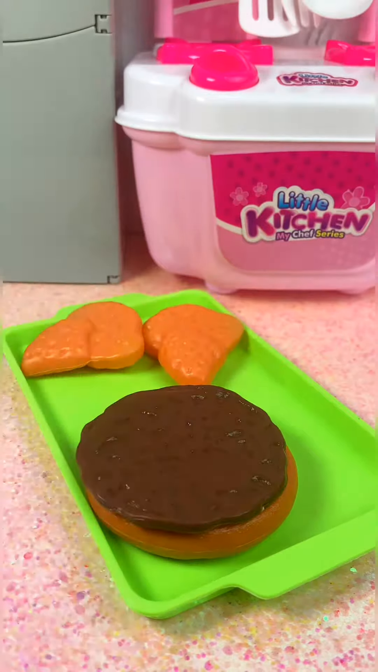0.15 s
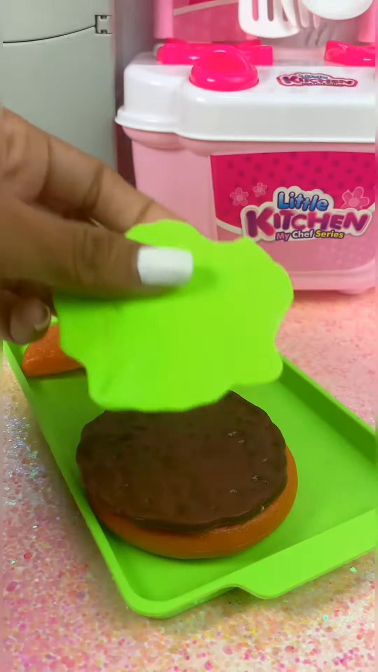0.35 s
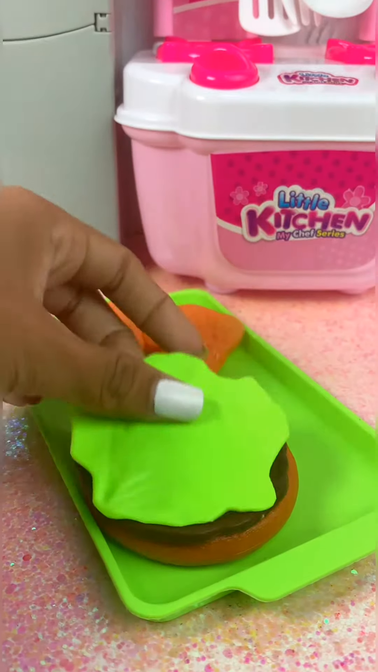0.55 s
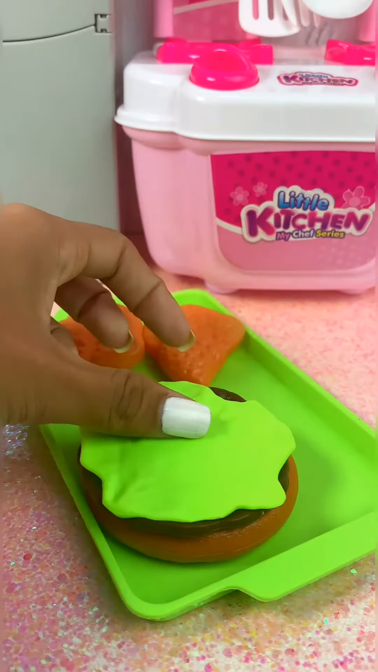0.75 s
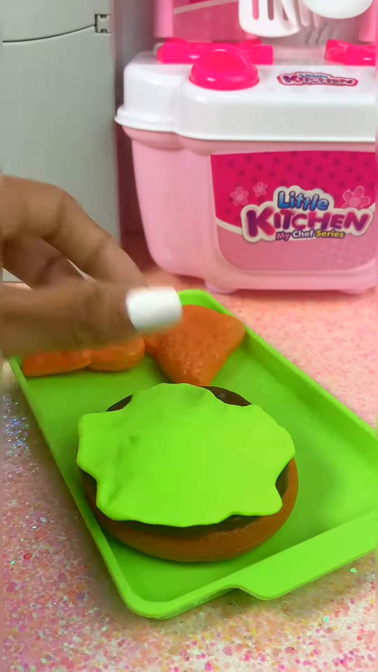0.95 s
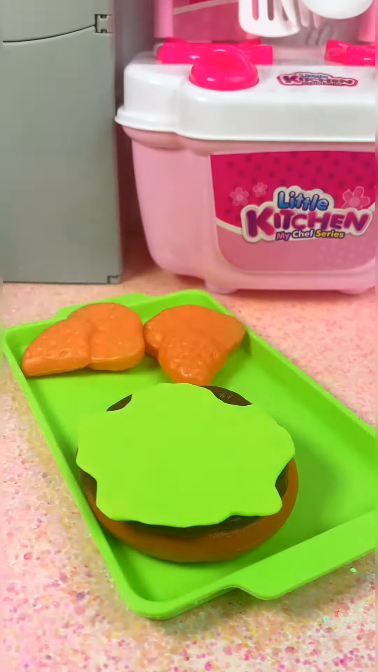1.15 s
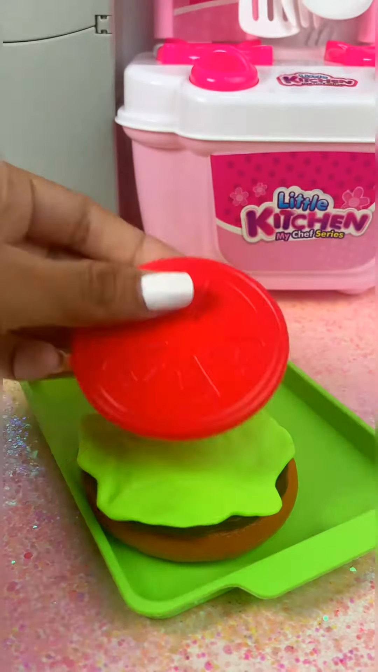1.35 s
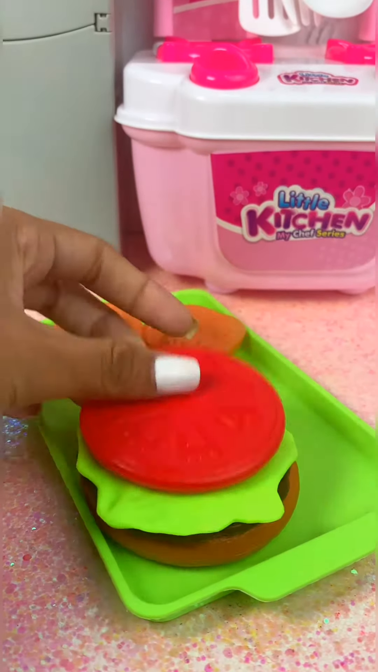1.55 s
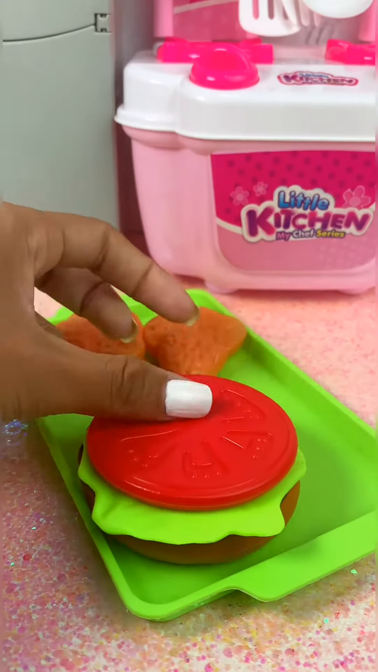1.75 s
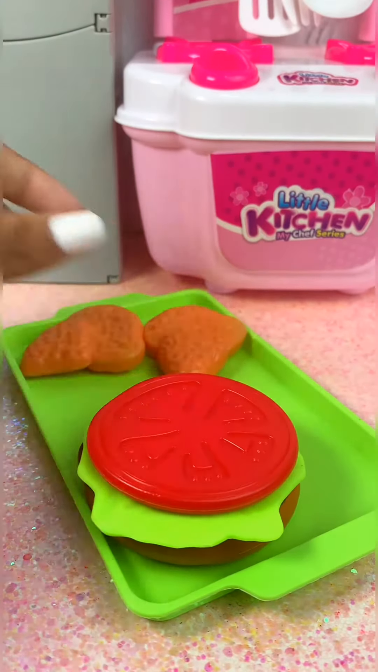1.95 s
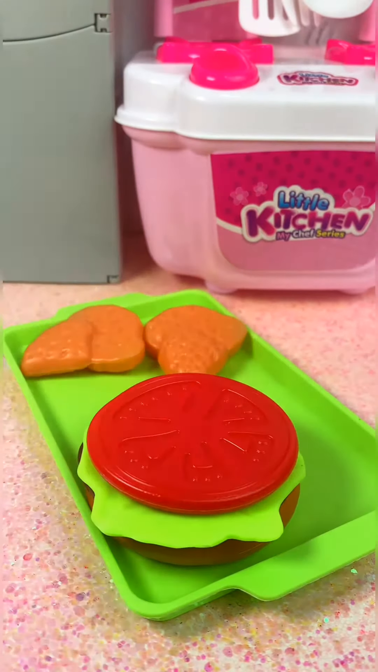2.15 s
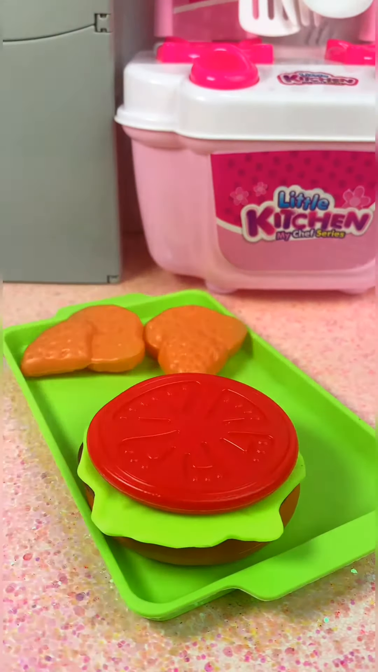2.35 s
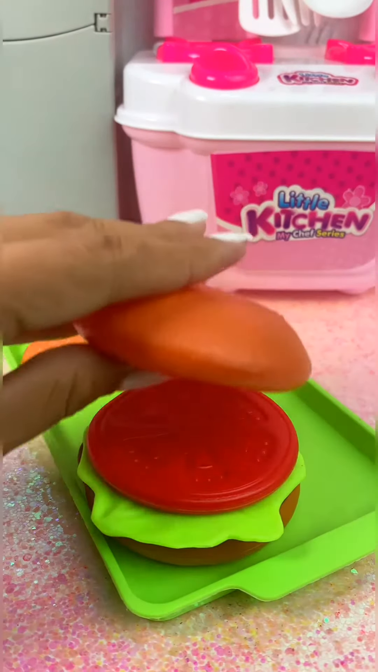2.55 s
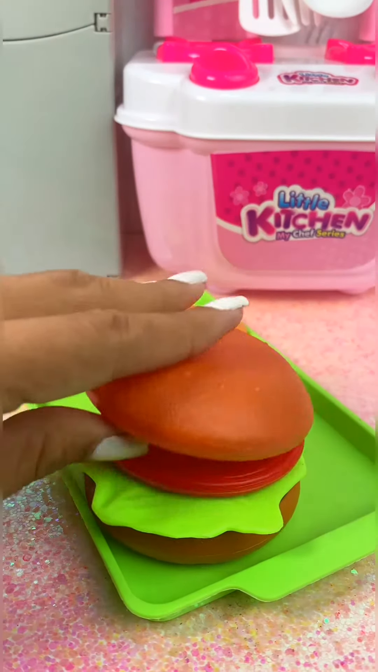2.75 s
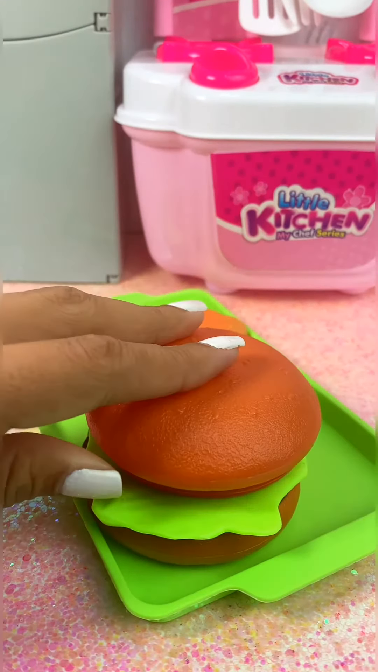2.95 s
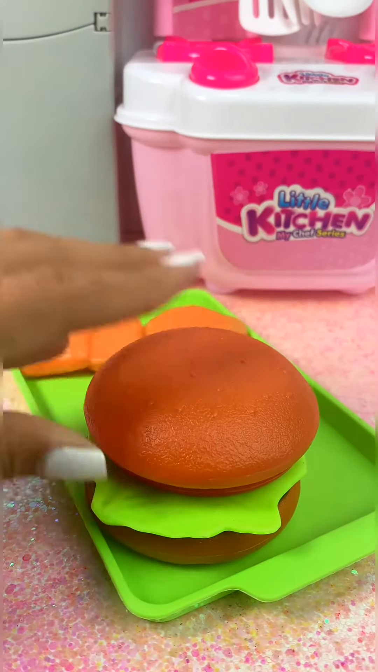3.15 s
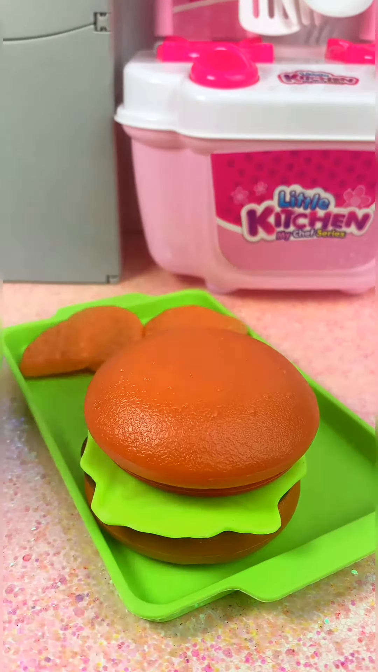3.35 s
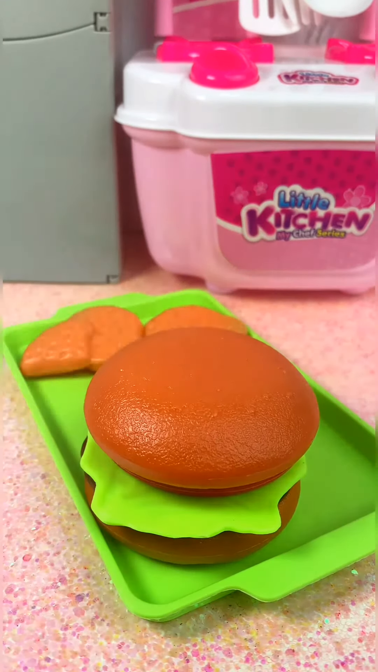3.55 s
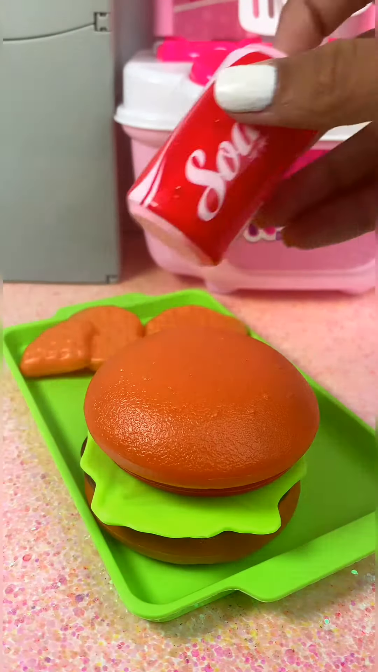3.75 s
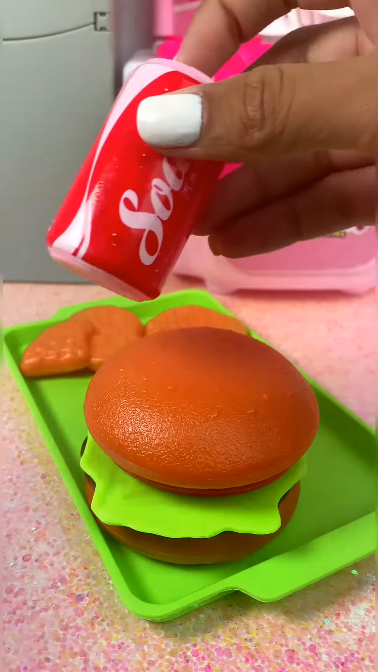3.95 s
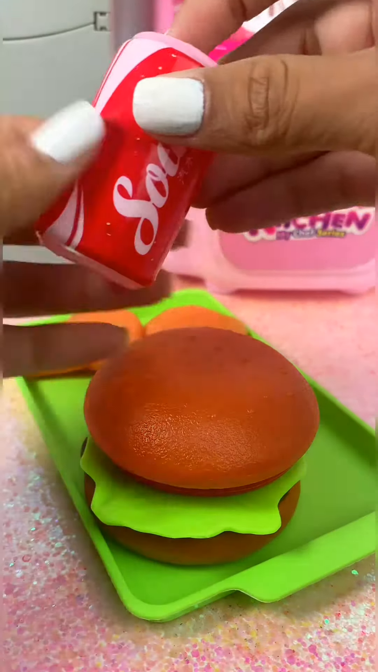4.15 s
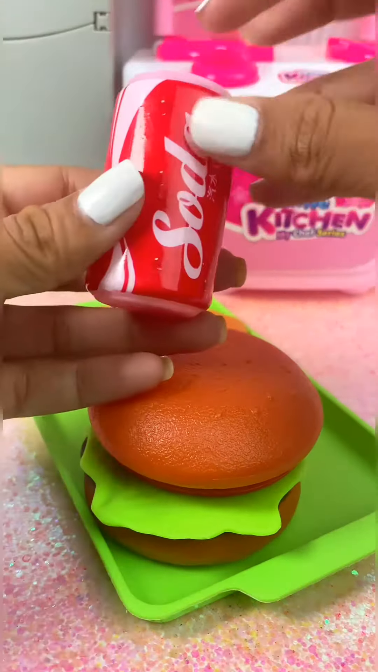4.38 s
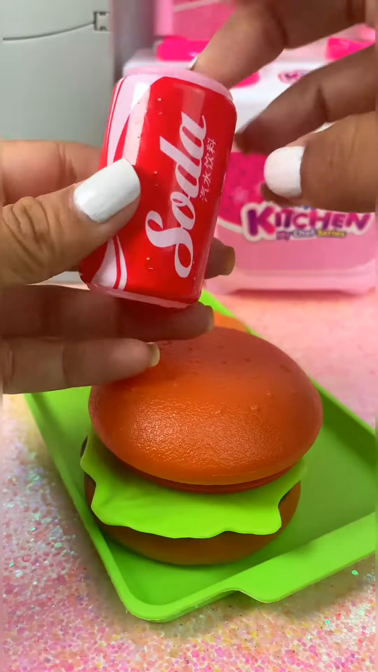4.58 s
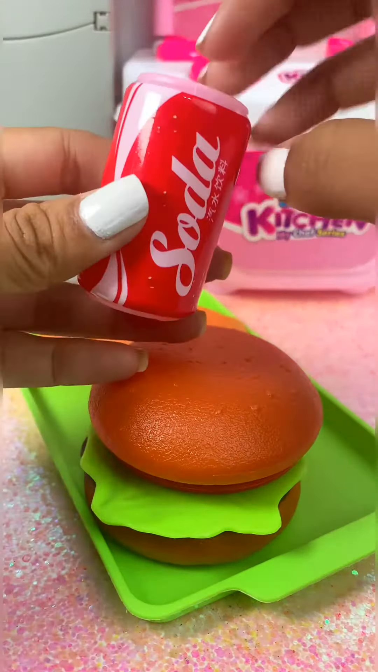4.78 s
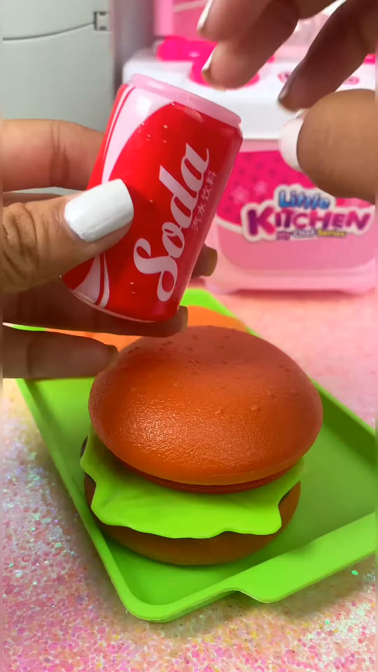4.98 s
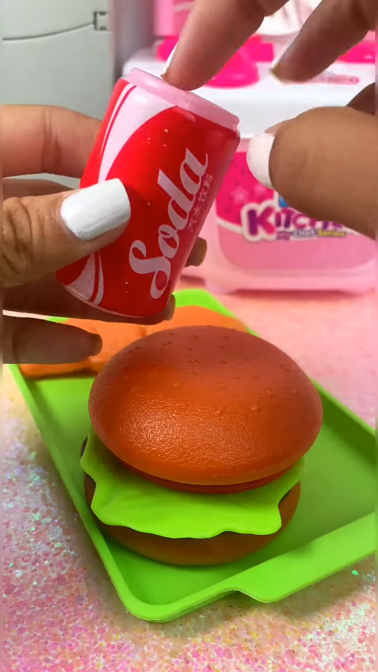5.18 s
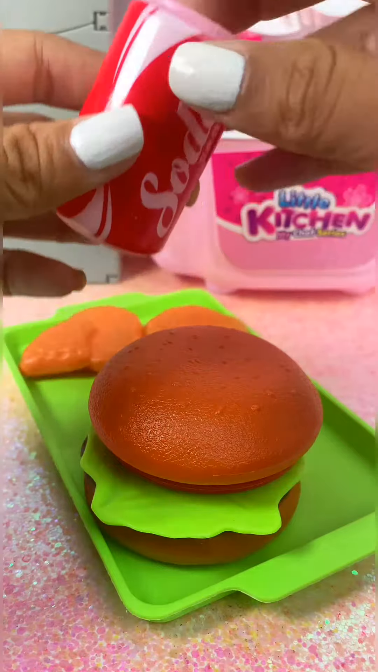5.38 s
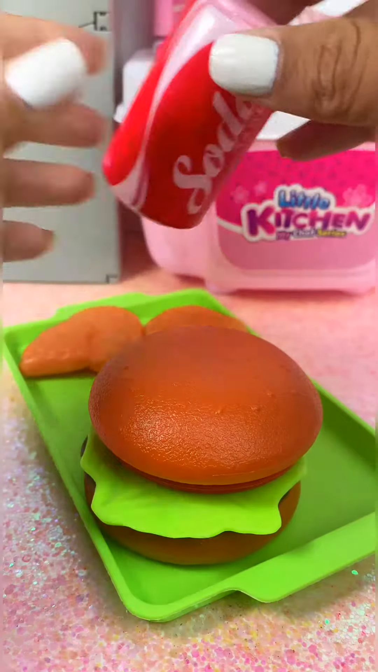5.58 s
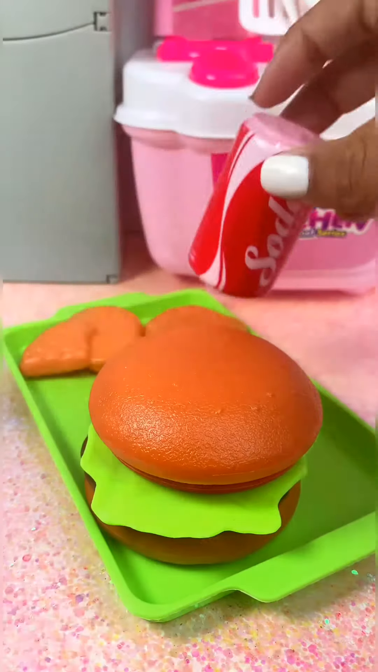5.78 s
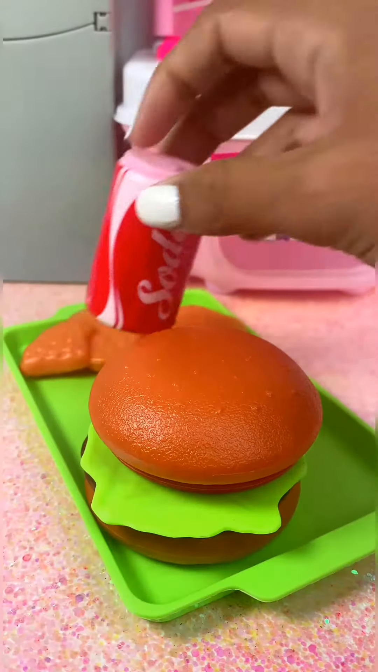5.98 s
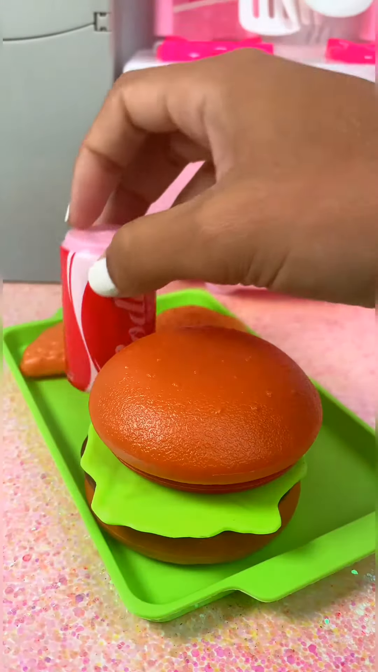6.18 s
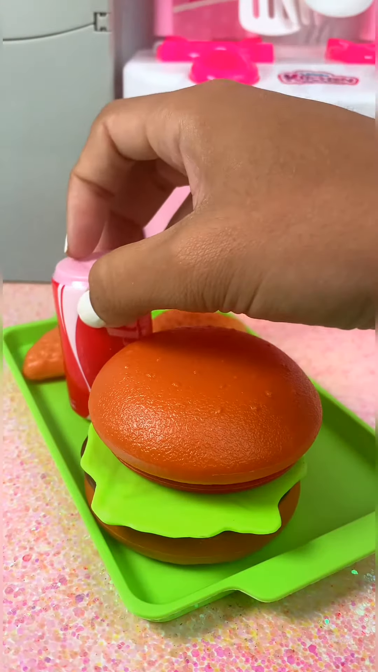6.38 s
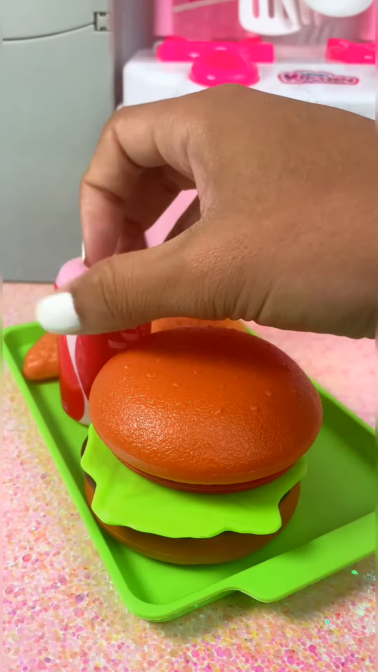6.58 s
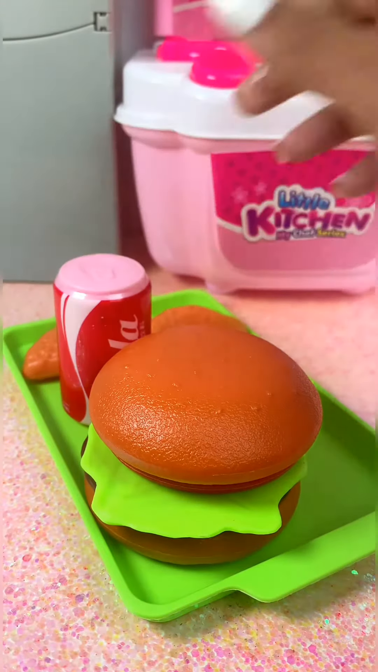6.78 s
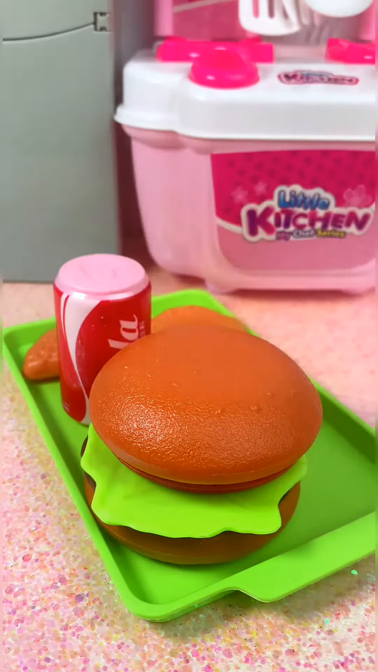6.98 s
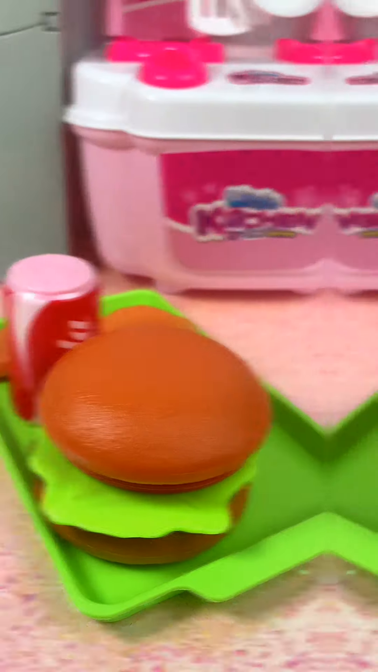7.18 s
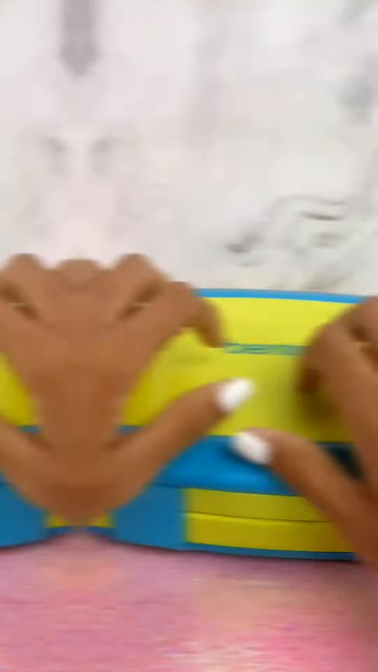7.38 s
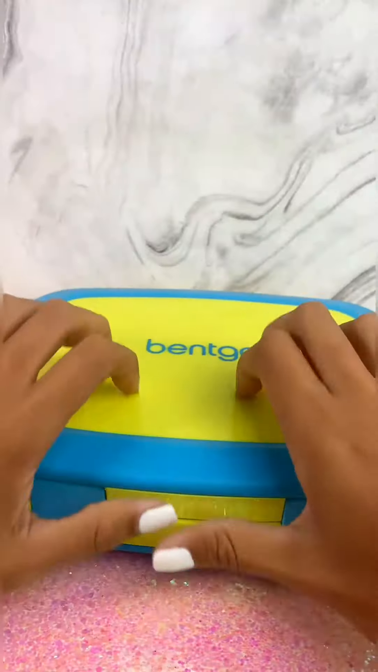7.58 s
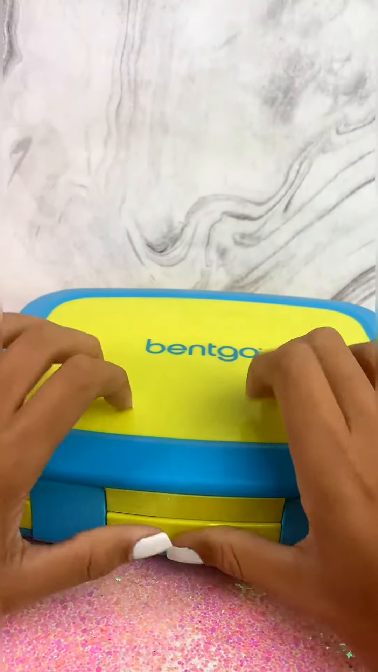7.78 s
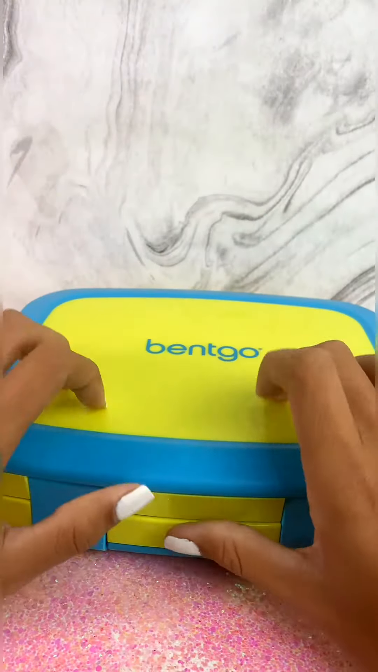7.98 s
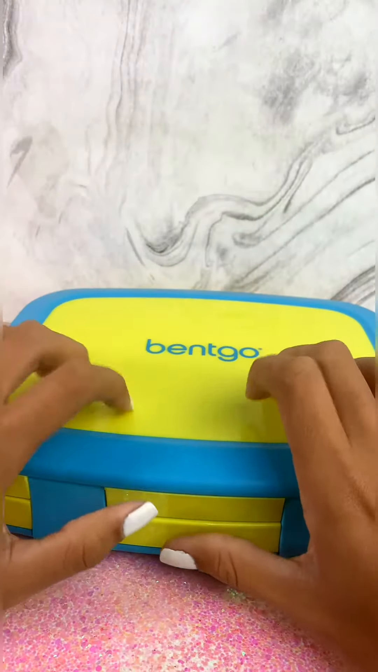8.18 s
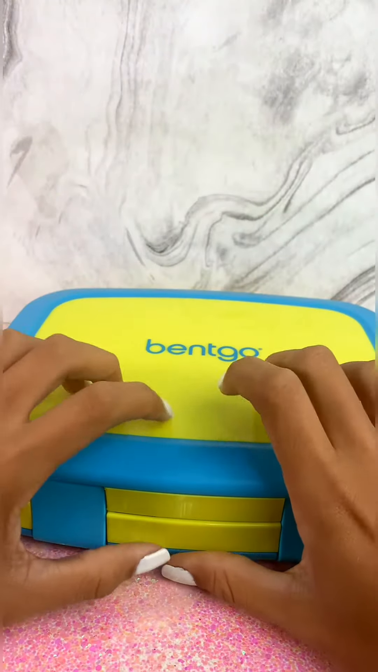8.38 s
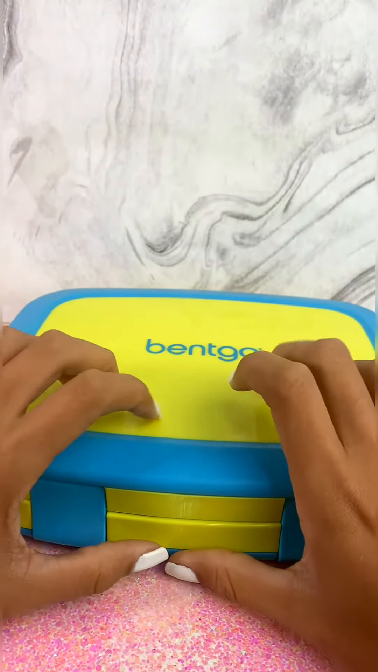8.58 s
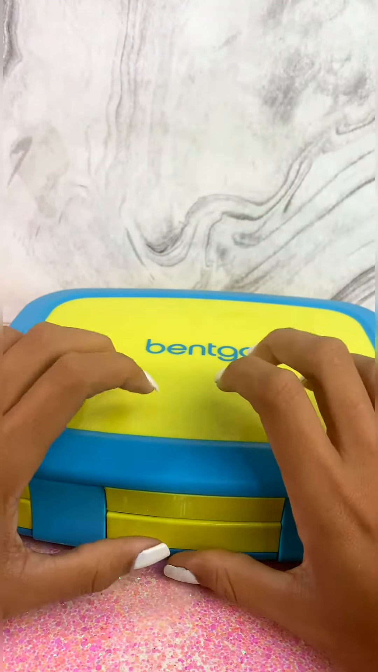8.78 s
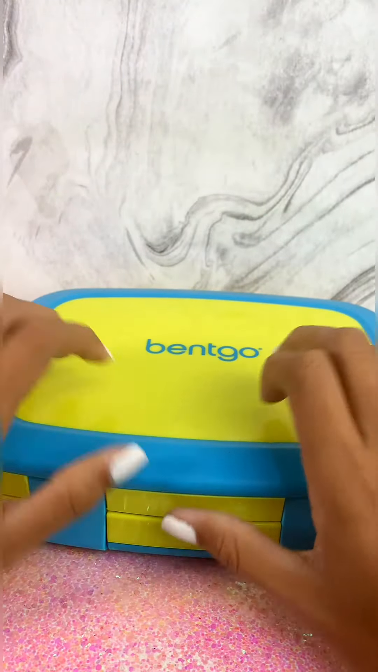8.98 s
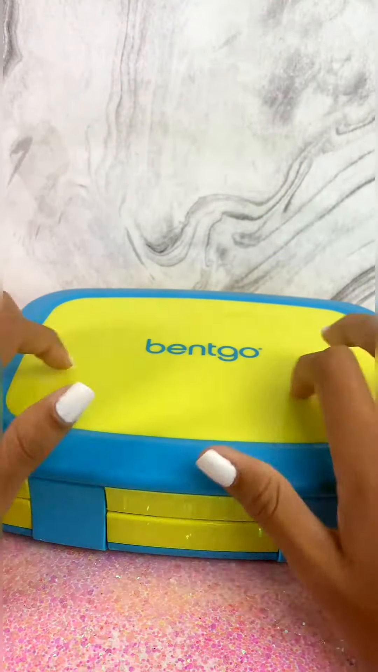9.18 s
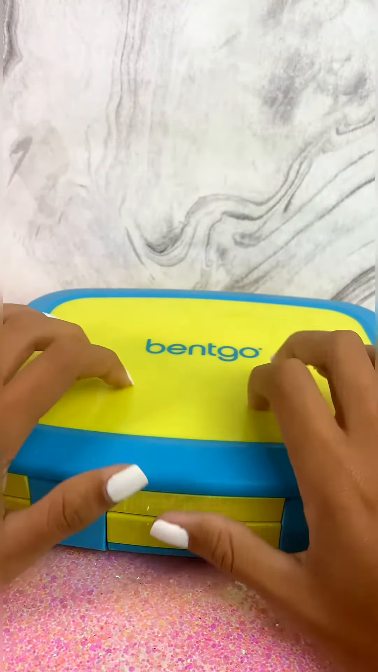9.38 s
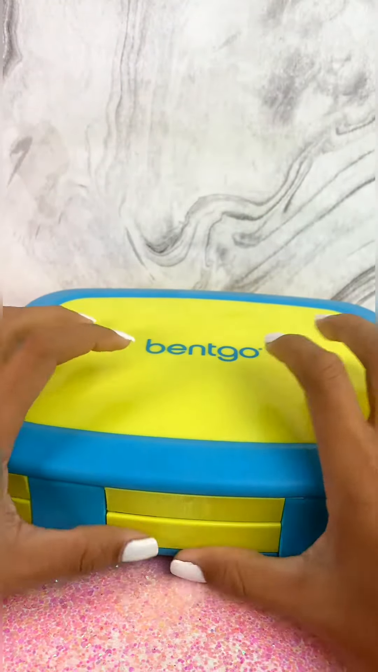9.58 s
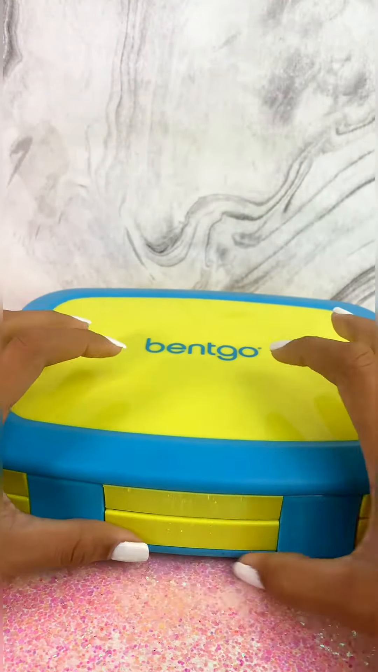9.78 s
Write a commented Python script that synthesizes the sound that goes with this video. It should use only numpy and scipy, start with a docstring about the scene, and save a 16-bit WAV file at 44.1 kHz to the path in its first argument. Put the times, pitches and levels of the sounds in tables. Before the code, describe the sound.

Close stereo microphones in a small humming room. Plastic toy slices drop with bright, dry clatters and short scuffs, then a hollow bun settles with a lower knock and grinding rub. Long nails click sharply on a hollow toy can, which is set softly on a tray. Sound fades to silence, returns, and nails drum busily on a hollow lunch box lid, ending in slides and small catches.

```python
"""An appliance hums, whirrs and stirs the air in a small room: a slow sine, narrow noise bands, broad noise.
Toy food slices, then a hollow bun, are dropped and rubbed: short noise cracks with ringing modes, and scuffs.
Long nails click on a hollow toy can, which is then set down on the tray. Soft bumps thud through the table.
Everything fades to silence and back; then nails drum, slide and catch on a lunch box lid, over dull pad noise.
Two close microphone ports hear it all, the left one slightly earlier over most of the range."""
import sys
import numpy as np
from scipy import signal
from scipy.fft import rfft, irfft, next_fast_len
from scipy.io import wavfile
from scipy.ndimage import map_coordinates

SR = 44100
rng = np.random.default_rng(int(sys.argv[2]) if len(sys.argv) > 2 else 0)


def generate_wav(signal):
    """Clip the signal to [-1, 1] and save it as 16-bit WAV at the path in sys.argv[1]."""
    frames = np.transpose(np.atleast_2d(signal))
    scaled = np.clip(frames, -1, 1) * 32767
    pcm = np.round(scaled).astype(np.int16)
    wavfile.write(sys.argv[1], SR, pcm)


N = 433944
SIDES = np.array([[.5], [-.5]])  # a left-right difference is shared half and half


def amp(db):
    """Decibels to gain."""
    return 10 ** (np.asarray(db) / 20)


def unit(x):
    """Scale to rms 1."""
    return x / np.sqrt(np.mean(x ** 2) + 1e-20)


def along(points, hz):
    """Read a value between (f/Hz, value) points on a log frequency axis."""
    f, value = np.transpose(points)
    return np.interp(np.log(hz + 1), np.log(f + 1), value)


def curve(rows):
    """Join (t/s, value) rows into one value per sample."""
    return np.interp(np.arange(N) / SR, *np.transpose(rows))


def wobble(rate, size):
    """A smooth random curve through `rate` random knots a second."""
    knots = rng.standard_normal(int(size * rate / SR) + 4)
    return map_coordinates(knots, [np.arange(size) * rate / SR])


def filtered(x, response):
    """Shape x with a (possibly complex) response of frequency."""
    n = x.shape[-1]
    padded = next_fast_len(n + 2048)
    spectrum = rfft(x, padded) * response(np.fft.rfftfreq(padded, 1 / SR))
    return irfft(spectrum, padded)[..., :n]


def noise(spectrum, shape):
    """Coloured noise of rms 1."""
    return unit(filtered(rng.standard_normal(shape), lambda hz: amp(along(spectrum, hz))))


def paired(two, alike):
    """Blend two unrelated signals into left and right of a given likeness."""
    def shares(hz):
        turn = np.arccos(np.clip(along(alike, hz), -1, 1)) / 2
        return np.array([np.cos(turn), np.sin(turn)])

    mid, side = filtered(two, shares)
    return np.array([mid + side, mid - side])


def add(track, s, sound):
    """Mix a sound into the track at s seconds."""
    place = track[..., max(round(s * SR), 0):][..., :sound.shape[-1]]
    place += sound[..., :place.shape[-1]]


def band(edges):
    """A band filter between two edges in Hz."""
    return signal.butter(3, edges, 'band', fs=SR, output='sos')


# how the hum swells and sinks, before its overall gain: (t/s, level/dB)
HUM_SWELL = [(0.0, -44), (0.48, -47.5), (2.24, -43.5), (2.88, -46), (3.08, -51.5), (3.32, -44.5),
             (4.28, -51.5), (4.48, -43), (5.2, -48.5), (5.84, -44), (6.04, -51), (6.64, -40.5),
             (7.68, -47.5), (8.6, -40), (8.76, -53.5), (9.08, -43), (9.52, -44), (9.8, -54.5)]


def hum(gain_db):
    """The motor's hum: a sine whose loudness and phase wander slowly."""
    t = np.arange(N) / SR
    level = amp(curve(HUM_SWELL) + gain_db + 1.1 * wobble(10, N))
    return level * np.sqrt(2) * np.sin(2 * np.pi * 57.6 * t + 0.4 * wobble(1.9, N))


# narrow bands of the appliance's whirr: (f/Hz, level/dB, width/Hz)
WHIRR_BANDS = [(122.6, -60, 5.4), (212, -57, 7), (293.6, -62, 7), (937, -64, 32)]


def whirr():
    """Each whirring band is a sine and cosine with randomly wandering strengths."""
    t, track = np.arange(N) / SR, np.zeros(N)
    for hz, db, width in WHIRR_BANDS:
        sine = wobble(2 * width, N) * np.sin(2 * np.pi * hz * t)
        cosine = wobble(2 * width, N) * np.cos(2 * np.pi * hz * t)
        track += amp(db) * unit(sine + cosine)
    return track


# colour of the moving air, relative: (f/Hz, level/dB per Hz)
AIR_COLOUR = [(20, -20.5), (40, -5), (90, -4.5), (140, -4), (260, -0.5), (400, -10), (620, -13.5),
              (800, -15.5), (1000, -14.5), (1500, -17.5), (2500, -27), (4500, -26.5), (6500, -42),
              (15500, -47)]
# how alike the air sounds left and right: (f/Hz, likeness up to 1)
AIR_LIKENESS = [(100, 0.91), (280, 0.77), (450, 0.3), (800, 0.24), (1500, 0.14), (2600, 0.27), (4000, 1),
                (15000, 1)]


def moving_air(level_db):
    """Moving air: broad noise that slowly swells, partly different left and right."""
    return amp(level_db + 2.5 * wobble(4.2, N)) * unit(paired(noise(AIR_COLOUR, (2, N)), AIR_LIKENESS))


# brief dips in the background level: (t/s, depth/dB)
BACKGROUND_DIPS = [(0.625, 14), (1.614, 8.5)]


def appliance(air_db, hum_db):
    """The background: hum, whirr and air together, with brief dips in level."""
    t = np.arange(N) / SR
    half_width_s = 0.061
    dip_db = sum(depth * np.exp(-((t - s) / half_width_s) ** 2) for s, depth in BACKGROUND_DIPS)
    return (hum(hum_db) + whirr() + moving_air(air_db)) * amp(-dip_db)


# how alike cracks and scrapes sound left and right: (f/Hz, likeness up to 1)
CONTACT_LIKENESS = [(200, 0.87), (700, 0.19), (1200, 1), (2600, 0.21), (4000, 0.98), (15000, 0.96)]


def rubs(strokes, spectrum, grain_db, scuff_db):
    """Skin and plastic catch and slip: tiny grains, bunched into scuffs under each stroke."""
    track = np.zeros((2, N))
    scrape_and_hiss = [band([500, 6000]), band([6000, 16500])]
    for s, length, scrape_db, hiss_db in strokes:
        n = int(max(length, .005) * SR)  # no stroke is shorter than 5 ms
        grip = amp(grain_db * wobble(350, n) + scuff_db * wobble(41, n)) * signal.windows.tukey(n, .5)
        grains = paired(noise(spectrum, (2, n)), CONTACT_LIKENESS) * grip
        for sos, db in zip(scrape_and_hiss, (scrape_db, hiss_db)):
            add(track, s, amp(db) * unit(signal.sosfilt(sos, grains)))
    return track


# fingers and pieces sliding or catching: (t/s, length/s, scrape level/dB, hiss level/dB)
HAND_STROKES = [(0.064, 0.028, -69, -69.5), (.246, 0.0043, -64, -59), (.445, .09, -50, -56.5),
                (.522, 0.026, -41.5, -41.5), (.61, 0.22, -67, -78), (.765, 0.044, -65, -79),
                (1.483, 0.026, -52, -56), (1.56, 0.15, -62, -73), (1.657, 0.019, -56, -61),
                (2.305, 0.082, -61.5, -60.5), (2.394, 0.0068, -52, -60.5), (2.66, 0.12, -66.5, -64),
                (7.11, 0.036, -63, -62.5), (7.363, 0.67, -70, -67), (9.346, 0.015, -50, -60),
                (9.52, 0.18, -55.5, -56.5), (9.65, .1, -55.5, -70)]
# colour of the sliding: (f/Hz, level/dB)
HAND_SCRAPE = [(500, -10.5), (1500, -2.5), (2200, -3.5), (3500, -1.5), (5400, -2.5), (6600, -16),
               (15000, -17.5), (16000, -24)]


def hand_rubs():
    """Fingers and pieces slide or catch, each stroke a grainy noise."""
    return rubs(HAND_STROKES, HAND_SCRAPE, grain_db=3, scuff_db=4.0)


FOOD_ROUGH, LID_ROUGH, CAN_ROUGH = .025, .028, .009  # how far contact jostles the modes, share of pitch
JOSTLE_HZ, CHATTER_HZ = 500, 1500  # how fast a loose contact shifts and chatters


def ring(modes, t, swell_cycles, detune, scatter_db, port_spread, rough):
    """The struck thing rings in several modes, each swelling up and dying away at its own pace."""
    hz, mode_db, life = np.transpose(modes)[:, :, None]
    strength, shift, phase = rng.standard_normal((3, len(modes), 1))
    # one push starts all modes, neighbours in opposite directions (phases in turns)
    opposite = np.argsort(np.argsort(hz, axis=0), axis=0) / 2
    # the modes start a little out of step, and differently at each port
    phase = opposite + .12 * phase + port_spread * rng.standard_normal((2, len(modes), 1))
    # the grip shifts the modes and loose contact jostles them; enclosed air, ringing longer, is left alone
    jostle = np.array([wobble(JOSTLE_HZ, len(t)) for _ in modes])
    pitch = hz * (1 + (detune * shift + rough * jostle) * (life < .12))
    swell = 1 - np.exp(-(t * hz / swell_cycles) ** 2)  # low modes take longer to get moving
    fading = amp(mode_db + scatter_db * strength - 60 * t / life)
    waves = np.sin(2 * np.pi * (np.cumsum(pitch, axis=1) / SR + phase))
    return (fading * swell * waves).sum(axis=1)


def crack_noise(crack, t, crack_db, crack_t60, tick_db, tick_t60, chatter_db):
    """A sharp first tick, then surfaces chatter together as the dense upper modes die away."""
    chatter = unit(amp(chatter_db * wobble(CHATTER_HZ, len(t))))
    tick = amp(tick_db - 60 * t / tick_t60)
    burst = (tick + chatter * amp(crack_db - 60 * t / crack_t60)) * (1 - np.exp(-t / 0.00058))
    return burst * paired(noise(crack, (2, len(t))), CONTACT_LIKENESS)


# edges between the registers thump, knock, clack, click and snap: (f/Hz)
REGISTER_EDGES = [160, 740, 1700, 2900, 6500, 16500]


def contacts(hits, crack, crack_db, crack_t60, tick_db, tick_t60, swell_cycles, detune, scatter_db,
             port_spread, rough, chatter_db, lag_s, push_db):
    """Each hit (t/s, levels of the five registers/dB, modes) pushes, cracks and rings the shell."""
    track, t = np.zeros((2, N)), np.arange(SR // 6) / SR
    bands = [band(edges) for edges in zip(REGISTER_EDGES, REGISTER_EDGES[1:])]
    blow = SR // 100  # levels hold for the first 10 ms
    for s, levels_db, modes in hits:
        push = amp(push_db) * np.exp(-t / .00015)
        sound = push + ring(modes, t, swell_cycles, detune, scatter_db, port_spread, rough)
        sound = sound + crack_noise(crack, t, crack_db, crack_t60, tick_db, tick_t60, chatter_db)
        # bending waves are slow in the bass: the thump comes lag_s late, higher registers sooner
        for sos, db, edge in zip(bands, levels_db, REGISTER_EDGES):
            part = signal.sosfilt(sos, sound)
            level = np.sqrt(np.mean(part[:, :blow] ** 2))
            add(track, s + lag_s * REGISTER_EDGES[0] / edge, amp(db) * part / level)
    return track


# each voice at brightness 0: (thump level/dB, knock level/dB, clack level/dB, click level/dB, snap level/dB)
VOICES = {"slice": (-15, -3, -2.5, 3.5, -4), "bun": (-8.5, -2, -1, 4, -4), "tray": (-7, 0.5, 6.5, -3, -15),
          "catch": (-16, -10, -1.5, -2, -8)}


def drops(rows, name, modes):
    """Brightness tilts a voice towards the treble: an edge or nail tip is bright, a flat landing dull."""
    voice = np.array(VOICES[name])
    tilt = np.linspace(-.5, .5, len(voice))
    return [(s, db + voice + bright_db * tilt, modes) for s, db, bright_db in rows]


# lettuce and tomato slices dropped on the stack: (t/s, strength level/dB, brightness/dB)
SLICE_DROPS = [(.4262, -29.5, -0.5), (.4338, -37.5, -10), (.491, -43.5, -4.5), (.4985, -50.5, -6),
               (.504, -49.5, -5), (.5145, -43, -12.5), (.5235, -43.5, 8.5), (.5285, -39.5, -1),
               (.5336, -30.5, 20.5), (.5361, -32.5, 8.5), (.5425, -35, 11), (1.2969, -45, -3.5),
               (1.4143, -31, -2.5), (1.5109, -32.5, 3), (1.5275, -36, -5), (1.5339, -37, 19),
               (1.5364, -25, 19), (1.5389, -27, 13.5), (1.5412, -30.5, 5), (1.5441, -37.5, -1),
               (1.7702, -42, -3), (1.7731, -43.5, -1)]
# what a slice rings: (f/Hz, level/dB, t60/s)
SLICE_MODES = [(964, 4.5, 0.035), (1120, 5, 0.028), (1392, 4, 0.03), (1616, -3.5, 0.023),
               (2700, -5.5, 0.016), (3120, 7.5, 0.016), (3420, 7.5, .018), (3610, 4, 0.026),
               (3860, 5.5, 0.029), (4930, 1.5, 0.017), (5600, -1, 0.013), (7300, 5, 0.01),
               (11100, 4, 0.0065)]
# colour of the crack of toy food, also used for tray and catching nails: (f/Hz, level/dB)
FOOD_CRACK_COLOUR = [(200, -22), (700, -5), (1800, -13), (3500, 1.5), (5300, 5.5), (6800, -7), (9000, 0.5),
                     (14000, -2.5), (16000, -17)]


def slice_drops():
    """Plastic slices clatter on the stack: short noise cracks over quickly fading modes."""
    return contacts(drops(SLICE_DROPS, "slice", SLICE_MODES), FOOD_CRACK_COLOUR,
                    crack_db=17, crack_t60=0.019, tick_db=24, tick_t60=0.0043, swell_cycles=0.99,
                    detune=0.038, scatter_db=4.0, port_spread=.05, rough=FOOD_ROUGH, chatter_db=5.5,
                    lag_s=0.00026, push_db=14)


def diffused(x):
    """A ring reaches the room smeared in pitch, so the echo is a hiss and not a note."""
    size = x.shape[1]
    drift = np.cumsum(.06 * wobble(JOSTLE_HZ, size))  # pitch spread as a share
    return np.array([map_coordinates(side, [np.arange(size) + drift]) for side in x])


# how long the room's tail rings: (f/Hz, t60/s)
ROOM_DECAY = [(200, 0.69), (1000, 0.27), (4000, 0.29), (8000, 0.32), (15000, 0.086)]


def room(x, near_db, near_t60, tail_db):
    """Quick scatter from table and backdrop, then a faint tail, in a random echo pattern."""
    out, step = np.zeros((2, N)), SR // 16  # the pattern is renewed 16 times a second
    for start in range(0, N, step):
        piece = x[:, start:start + step]
        if np.abs(piece).max() < 1e-3:  # too quiet to echo
            continue
        hz, frame_t, z = signal.stft(rng.standard_normal((2, SR // 2)), SR, nperseg=256)
        decay = amp(-60 * frame_t / along(ROOM_DECAY, hz)[:, None])
        tail = signal.istft(z * decay, SR, nperseg=256)[1]
        t = np.arange(tail.shape[1]) / SR
        near = rng.standard_normal(tail.shape) * amp(-60 * t / near_t60) * (t > .002)
        tail = tail * (1 - np.exp(-t / 0.0017))
        answer = amp(near_db) * near / np.linalg.norm(near[0])
        answer = answer + amp(tail_db) * tail / np.linalg.norm(tail[0])
        smeared = diffused(np.pad(piece, ((0, 0), (0, 256))))
        add(out, start / SR, signal.fftconvolve(smeared, answer, axes=1))
    return out


# how alike echoes and finger pads sound left and right: (f/Hz, likeness up to 1)
ROOM_LIKENESS = [(200, 0.93), (700, 1), (2500, 0.74), (4000, 1), (15000, 1)]


def echoes(toys, can, lid):
    """Toys, can and lid each get their own scatter and tail."""
    mixed = room(toys, near_db=-12.5, near_t60=0.091, tail_db=-19.0)
    mixed = mixed + room(can, near_db=-15.5, near_t60=0.063, tail_db=-17.5)
    mixed = mixed + room(lid, near_db=-14.5, near_t60=0.14, tail_db=-15.5)
    return paired(mixed, ROOM_LIKENESS)


# soft bumps on the table, before the thud is doubled: (t/s, level/dB)
TABLE_BUMPS = [(.53, -46.5), (1.274, -45.5), (1.541, -41.5), (2.372, -50), (3.665, -48), (9.199, -40.5)]


def bumps(table_hz, t60):
    """The hand's weight thuds through the table: low noise that swells and dies away."""
    track, t = np.zeros(N), np.arange(SR // 4) / SR
    for s, db in TABLE_BUMPS:
        thud = noise([(20, -26), (table_hz, 0), (220, -30), (3000, -120)], len(t))
        add(track, s, amp(db - 60 * t / t60) * (1 - np.exp(-t / 0.0051)) * 2 * thud)
    return track


# the hollow bun settling on top: (t/s, strength level/dB, brightness/dB)
BUN_DROPS = [(2.604, -32.5, -2), (2.6188, -43, -10), (2.6468, -32.5, 9.5), (2.6612, -50.5, -17),
             (2.7115, -60, 4), (2.747, -46, -6), (2.7565, -56, -16), (2.7948, -48, -7), (2.8013, -47, 0.5),
             (2.8115, -56, 7), (2.8193, -35, -6.5), (2.8288, -34.5, 17), (2.8314, -33.5, 0.5),
             (2.8368, -40, -8), (2.8445, -51, -14)]
# what the bun rings: (f/Hz, level/dB, t60/s)
BUN_MODES = [(556, 4, 0.034), (603, -1.5, 0.13), (698, 1.5, 0.066), (818.6, 0, 0.035), (1453, -7.5, 0.049),
             (2140, 3.5, 0.07), (3180, 0, 0.07), (3690, 10.5, 0.044), (3950, -23, 0.053), (6170, 0, 0.011),
             (7700, 15, .01)]


def bun_drops():
    """The hollow bun settles: cracks with a longer, lower ring than the slices."""
    return contacts(drops(BUN_DROPS, "bun", BUN_MODES), FOOD_CRACK_COLOUR,
                    crack_db=17.0, crack_t60=0.02, tick_db=33.0, tick_t60=0.0031, swell_cycles=0.44,
                    detune=0.014, scatter_db=4.5, port_spread=0.025, rough=FOOD_ROUGH, chatter_db=0.5,
                    lag_s=0.00034, push_db=16)


# the bun's rim on the slice below: (t/s, length/s, scrape level/dB, hiss level/dB)
BUN_STROKES = [(2.608, 0.033, -47.5, -59), (2.652, .1, -56, -69), (2.745, .025, -49.5, -56),
               (2.77, .04, -56.5, -67), (2.811, 0.038, -44.5, -61)]
# colour of the grinding: (f/Hz, level/dB)
BUN_GRIND = [(400, -10), (580, 5), (800, 5), (1100, -7), (1500, -5.5), (2600, -14), (3800, -0.5),
             (4700, -12), (6300, -5), (15000, -27)]


def bun_rubs():
    """The bun's rim grinds on the slice below, a coarse grainy noise."""
    return rubs(BUN_STROKES, BUN_GRIND, grain_db=5.5, scuff_db=2.0)


# fingers shifting on the hollow can: (t/s, length/s, scrape level/dB, hiss level/dB)
CAN_STROKES = [(3.591, .2, -67, -74.5), (4.142, 0.021, -51, -56), (4.308, .006, -49.5, -57.5),
               (4.338, 0.047, -55, -66), (4.476, 0.019, -50, -60), (4.886, .022, -43, -46),
               (5.075, .025, -52, -60), (6.135, 0.049, -52, -64), (6.452, 0.037, -47.5, -63),
               (6.484, 0.032, -51.5, -63.5), (6.54, 0.02, -58, -74)]
# colour of fingers on the can: (f/Hz, level/dB)
CAN_RUB_COLOUR = [(1200, -7), (1750, -5), (2060, 5), (2600, -17), (3400, -8), (4200, -5), (5400, -7.5),
                  (6600, -18.5), (10500, -19.5), (16000, -28.5)]


def can_rubs():
    """Fingers shift on the hollow can, a grainy noise with its own colour."""
    return rubs(CAN_STROKES, CAN_RUB_COLOUR, grain_db=4, scuff_db=2.5)


# nails on the can: (t/s, hollow level/dB, wall level/dB, wall f/Hz, nail snap level/dB)
CAN_CLICKS = [(3.7195, -47.5, -39, 4270, -51), (4.4882, -20.5, -28, 4630, -27),
              (4.4922, -31.5, -31.5, 3900, -50), (4.5997, -25, -31.5, 4830, -35.5),
              (4.685, -45, -45, 4450, -51.5), (4.7912, -37, -25.5, 4410, -44.5),
              (4.857, -25, -20.5, 4473, -27), (4.868, -37, -43, 4430, -46), (4.8926, -39, -41, 4500, -52),
              (4.8993, -32.5, -52, 4543, -40.5), (4.9865, -24.5, -22, 5500, -25.5),
              (5.0407, -25, -27, 4334, -28), (5.11, -38.5, -22.5, 5310, -33.5),
              (5.3582, -60, -58, 4240, -65), (5.487, -72, -57, 4800, -58.5)]
# modes of the can, wherever it is struck: (f/Hz, level/dB, t60/s)
CAN_MODES = [(546, 4, 0.008), (2116, 17.5, 0.023), (3210, -2, 0.0085), (4030, 5, 0.016), (5370, 4, .01),
             (8070, 7.5, 0.006), (10980, 1, 0.0052)]
# colour of a nail's crack on the can: (f/Hz, level/dB)
CAN_CRACK_COLOUR = [(200, -3), (550, 11), (850, -23), (1400, 9), (2200, -19), (2900, -20), (4500, 5),
                    (6400, -2.5), (8300, 2.5), (11000, 6.5), (15000, 2), (16000, -19)]


def can_taps():
    """Nails on the can: the same hollow modes each time, and a wall ring that depends on the spot."""
    taps = []
    for s, hollow, wall, wall_hz, snap in CAN_CLICKS:
        low = (hollow + wall) / 2
        levels_db = [low - 18.5, low - 9, hollow, wall, snap]
        taps.append((s, levels_db, CAN_MODES + [(wall_hz, 14, .01)]))  # wall ring: Hz, dB, t60 in s
    return contacts(taps, CAN_CRACK_COLOUR,
                    crack_db=10.0, crack_t60=0.016, tick_db=23, tick_t60=0.0017, swell_cycles=0.92,
                    detune=0.0073, scatter_db=6.0, port_spread=0.025, rough=CAN_ROUGH, chatter_db=3,
                    lag_s=0.00014, push_db=11)


# the can set down on the tray: (t/s, strength level/dB, brightness/dB)
TRAY_DROPS = [(6.1519, -40, 4.5), (6.1555, -55, -13), (6.217, -62, 11), (6.2582, -42, 10),
              (6.2635, -50, -1)]
# what the tray rings: (f/Hz, level/dB, t60/s)
TRAY_MODES = [(1130, -15, 0.038), (1690, -4, 0.021), (2180, 9, 0.012), (3070, -11, 0.019),
              (3740, 3.5, 0.047)]


def tray_drops():
    """The can is set down: a few soft cracks ring the tray."""
    return contacts(drops(TRAY_DROPS, "tray", TRAY_MODES), FOOD_CRACK_COLOUR,
                    crack_db=8, crack_t60=0.039, tick_db=25.0, tick_t60=0.0035, swell_cycles=0.29,
                    detune=0.028, scatter_db=8.5, port_spread=0.044, rough=FOOD_ROUGH, chatter_db=2,
                    lag_s=0.00053, push_db=13)


def fade():
    """A straight fade down to silence between toys and box, and a quicker one back up."""
    silent_s, fade_out_s, fade_in_s = 7.323, 0.51, 0.22
    since = np.arange(N) / SR - silent_s
    return np.minimum(np.maximum(-since / fade_out_s, since / fade_in_s), 1)


# nails on the lid: (t/s, thump level/dB, knock level/dB, nail click level/dB, struck spot f/Hz)
LID_DRUMMING = [(7.3638, -30, -38, -34.5, 935), (7.398, -33, -40, -36, 940),
                (7.4292, -43.5, -37.5, -39, 890), (7.4576, -38, -36, -36, 900),
                (7.483, -31, -36, -34.5, 900), (7.5191, -46.5, -36, -32, 860),
                (7.5771, -31.5, -33.5, -33.5, 914), (7.6176, -41.5, -33.5, -38.5, 1057),
                (7.6433, -45, -35, -33.5, 870), (7.682, -44, -45.5, -46, 870),
                (7.7099, -36, -34.5, -29, 970), (7.7505, -43.5, -34.5, -33.5, 860),
                (7.8288, -25.5, -29, -32.5, 917), (7.842, -44, -33, -34, 980),
                (7.8802, -31, -34, -27.5, 884), (7.906, -24.5, -26.5, -23.5, 921),
                (8.0527, -27.5, -30.5, -33.5, 911), (8.0648, -56, -25.5, -31.5, 1010),
                (8.094, -35, -39, -32, 855), (8.1049, -30.5, -35, -30, 920), (8.1333, -41, -34, -29.5, 970),
                (8.158, -44, -32.5, -32.5, 975), (8.2754, -30.5, -26.5, -28.5, 925),
                (8.2923, -40.5, -29.5, -31, 1040), (8.3167, -33.5, -30.5, -30, 840),
                (8.3463, -65, -44, -37.5, 960), (8.3864, -57, -35.5, -35, 940),
                (8.4794, -34, -33, -33, 973), (8.5, -59, -46, -46, 1210), (8.513, -45, -34, -34.5, 1020),
                (8.54, -55, -35, -39, 990), (8.5468, -37.5, -34.5, -34, 889),
                (8.605, -49, -38.5, -41.5, 1030), (8.7015, -30, -29.5, -31.5, 935),
                (8.717, -49, -46, -52, 910), (8.771, -38, -36.5, -37, 905), (8.7776, -35.5, -30, -30, 880),
                (8.794, -37, -32.5, -34, 995), (8.8306, -47, -35, -35.5, 974),
                (8.9906, -46, -32, -38, 1005), (9.0179, -45, -35.5, -37, 1020),
                (9.0564, -30, -27, -28.5, 954), (9.1937, -35, -29, -31, 1030),
                (9.208, -36, -31, -34.5, 960), (9.2144, -30.5, -34, -34.5, 790),
                (9.291, -34, -31.5, -30.5, 860), (9.2974, -44.5, -38, -37, 960)]
# how the lid radiates: (thump level/dB, knock level/dB, clack level/dB, click level/dB, snap level/dB)
LID_RADIATION = (-0.5, 0, -10.5, -1.5, -4)
# modes of the lid; the last four are the air in the box, ringing on faintly: (f/Hz, level/dB, t60/s)
LID_MODES = [(188.3, -13, .027), (308, 0, 0.034), (527, 7.5, 0.026), (608, 2, 0.026), (826, -3.5, .022),
             (1165, 1.5, .022), (1470, -7.5, 0.069), (2022, -8, 0.034), (3566, 2.5, 0.025),
             (4620, -2, 0.0126), (8460, 4.5, 0.0042), (533, -14, .19), (603.6, -13.5, 0.2), (975, -19, 0.2),
             (1234, -17, 0.15)]
# colour of a nail's crack on the lid: (f/Hz, level/dB)
LID_CRACK_COLOUR = [(200, -7), (900, -10.5), (2800, -5.5), (3800, 1.5), (4400, 11), (5300, 5), (6500, -10),
                    (8300, -11), (12000, -11.5), (15000, -13), (16000, -34)]


def drumming():
    """Nails drum on the lid: each tap has its own spot and its own share of thump, knock and click."""
    taps = []
    for s, thump, knock, click, spot_hz in LID_DRUMMING:
        levels_db = np.add(LID_RADIATION, [thump, knock, (knock + click) / 2, click, click])
        taps.append((s, levels_db, LID_MODES + [(spot_hz, 11, 0.026)]))  # spot ring: Hz, dB, t60 in s
    return contacts(taps, LID_CRACK_COLOUR,
                    crack_db=15.5, crack_t60=0.02, tick_db=21, tick_t60=0.0014, swell_cycles=0.75,
                    detune=.035, scatter_db=3.5, port_spread=0.084, rough=LID_ROUGH, chatter_db=3.5,
                    lag_s=0.00092, push_db=18)


# colour of finger pads on the lid, relative: (f/Hz, level/dB per Hz)
PAD_COLOUR = [(60, -21.5), (120, 6.5), (300, -19), (550, -4), (1100, -11.5), (2500, -22.5), (9000, -47)]


def pads(level_db, grain_db, t60):
    """After each nail the finger's pad lands and rolls on the hollow lid: a dull, grainy thrum."""
    power, t = np.zeros(N), np.arange(SR // 2) / SR
    for s, thump_db, knock_db, *_ in LID_DRUMMING:
        press = amp((thump_db + knock_db) / 2 - 60 * t / t60) * (1 - np.exp(-t / 0.012))
        add(power, s, press ** 2)
    thrum = unit(paired(noise(PAD_COLOUR, (2, N)), ROOM_LIKENESS) * amp(grain_db * wobble(150, N)))
    return amp(level_db) * np.sqrt(power) * thrum


# nails catching as the fingers slide over the lid: (t/s, strength level/dB, brightness/dB)
NAIL_CATCHES = [(9.4743, -65, 26), (9.4862, -62, 36), (9.5925, -42.5, 13), (9.597, -51, 0),
                (9.6235, -54, 6), (9.667, -45, -1), (9.6785, -50, 2), (9.7375, -51.5, -16),
                (9.7435, -51, -22.5), (9.812, -50, -20), (9.817, -54, -14), (9.822, -53.5, -14)]
# what a catching nail rings: (f/Hz, level/dB, t60/s)
CATCH_MODES = [(1330, 8, 0.0186), (2020, 5, 0.021), (2830, -7.5, 0.0155), (3410, 10, .014)]


def lid_catches():
    """Sliding nails catch on the lid: small cracks with a short ring."""
    return contacts(drops(NAIL_CATCHES, "catch", CATCH_MODES), FOOD_CRACK_COLOUR,
                    crack_db=8, crack_t60=0.0145, tick_db=21, tick_t60=.003, swell_cycles=.6,
                    detune=0.054, scatter_db=1.5, port_spread=0.071, rough=LID_ROUGH, chatter_db=5.5,
                    lag_s=.0003, push_db=8.5)


# direct sound, left minus right: (f/Hz, level/dB)
LEFT_RIGHT_BALANCE = [(300, 3), (700, -6), (1100, 0), (2000, -7), (2600, -4.5), (3300, -0.5)]


def scene():
    """Toys and lunch box close by, mostly a little to the right, in the humming room."""
    toys = slice_drops() + bun_drops() + tray_drops() + hand_rubs() + bun_rubs() + can_rubs()
    can = can_taps()
    lid = drumming() + lid_catches()
    direct = filtered(toys + can + lid, lambda hz: amp(SIDES * along(LEFT_RIGHT_BALANCE, hz)))
    hands = bumps(table_hz=65.47, t60=0.15) + pads(level_db=-13.0, grain_db=2, t60=0.41)
    background = appliance(air_db=-51.0, hum_db=1.0)
    return fade() * (direct + echoes(toys, can, lid) + hands + background)


# how far the left port leads the right: (f/Hz, phase/radians)
LEFT_LEAD = [(0, -1.5), (60, 0.24), (250, 0.24), (600, 1.15), (1000, 1.1), (1400, 0.48), (2200, 2),
             (3400, 1.37), (4700, 3), (15200, 19)]


def record(dry):
    """Loud peaks are rounded off, the ports are set out of step, and the top treble is cut steeply."""
    rounded = dry / (1 + (dry / .65) ** 6) ** (1 / 6)
    top_hz = 16500

    def ports(hz):
        lead = np.exp(1j * SIDES * np.interp(hz, *np.transpose(LEFT_LEAD)))
        return lead / (1 + (hz / top_hz) ** 120)

    return filtered(rounded, ports)


dry = scene()
out = record(dry)
generate_wav(out)
```